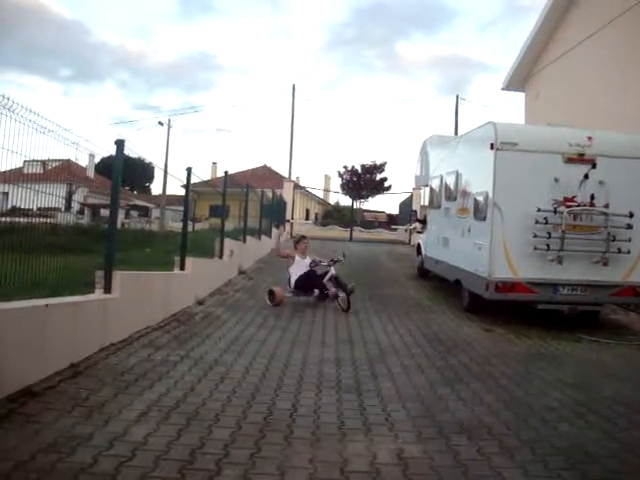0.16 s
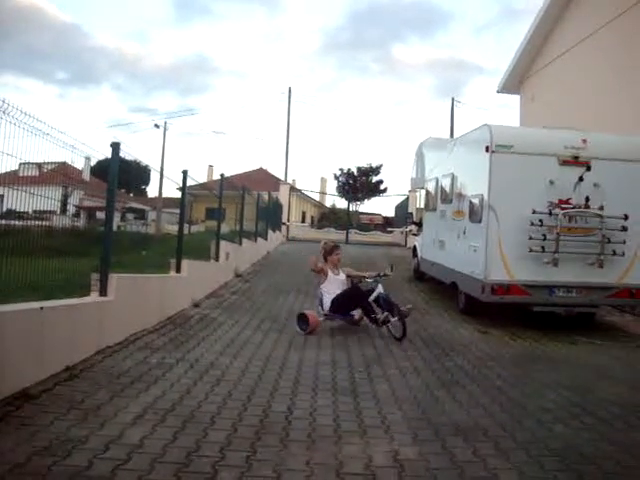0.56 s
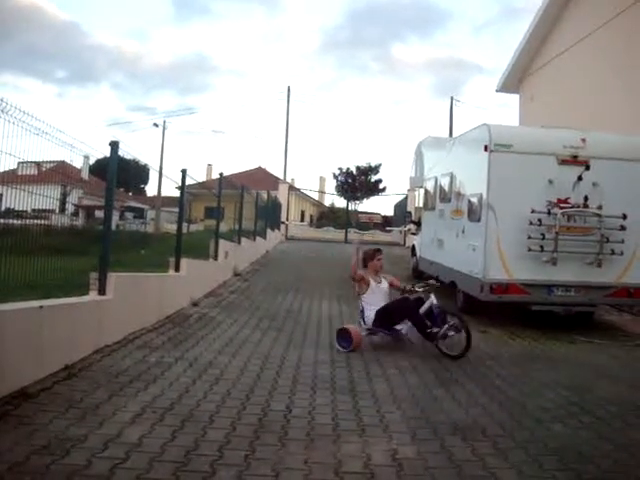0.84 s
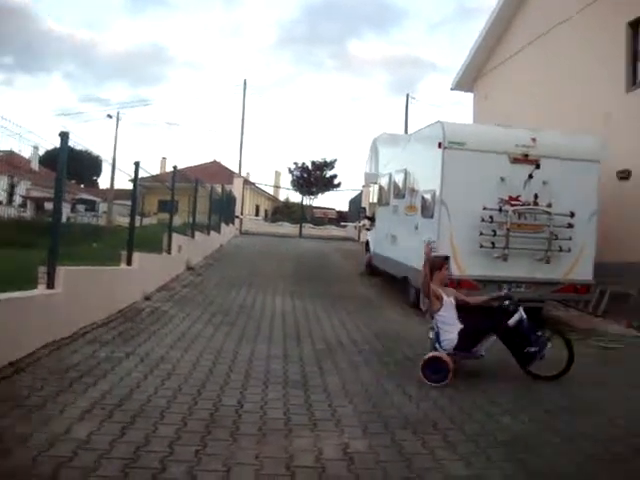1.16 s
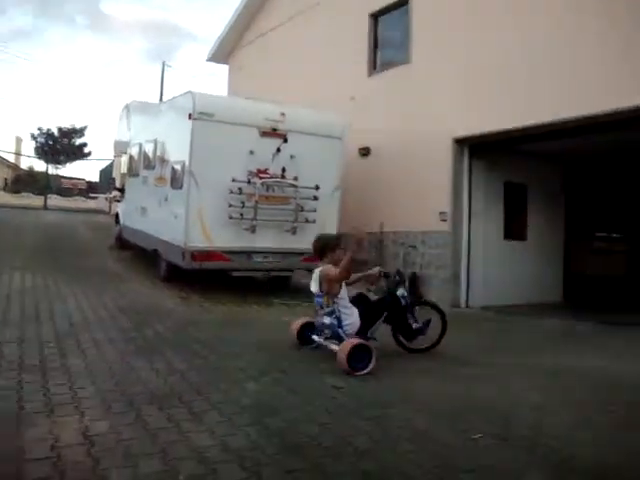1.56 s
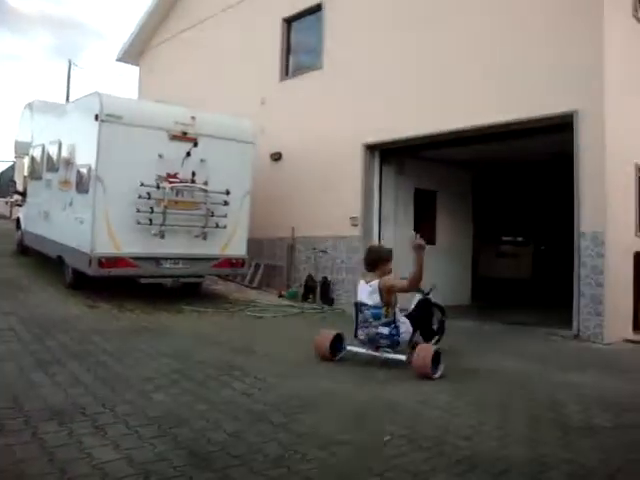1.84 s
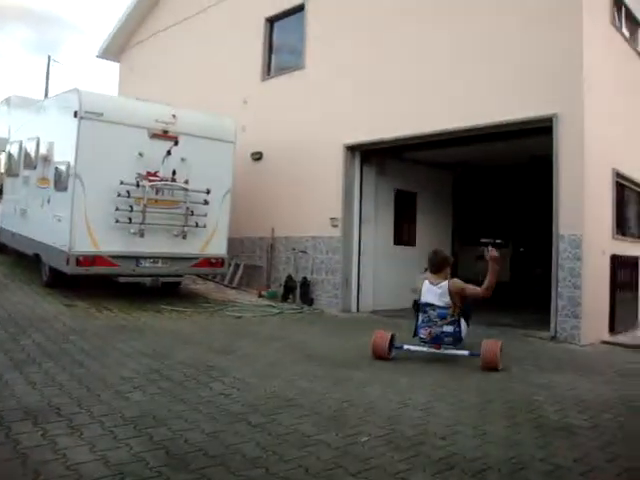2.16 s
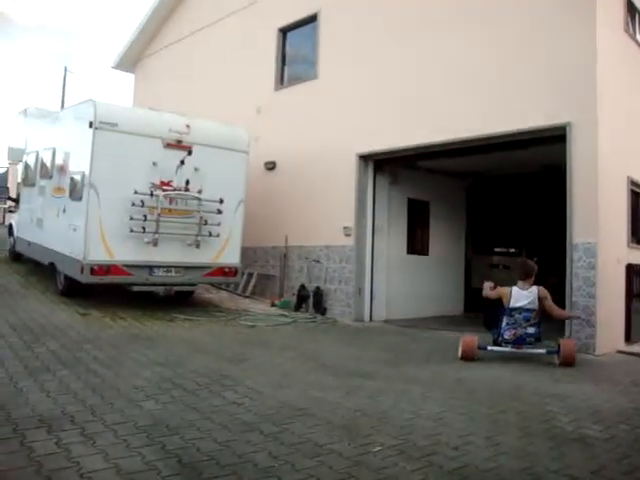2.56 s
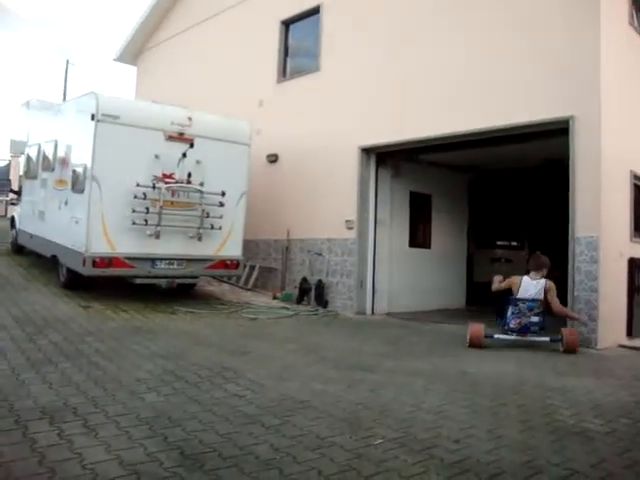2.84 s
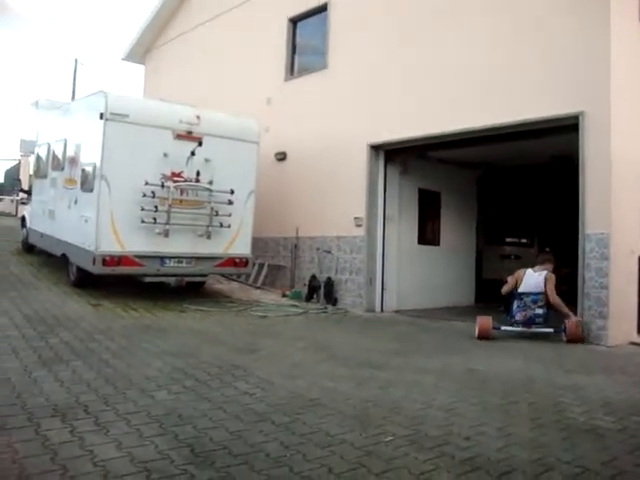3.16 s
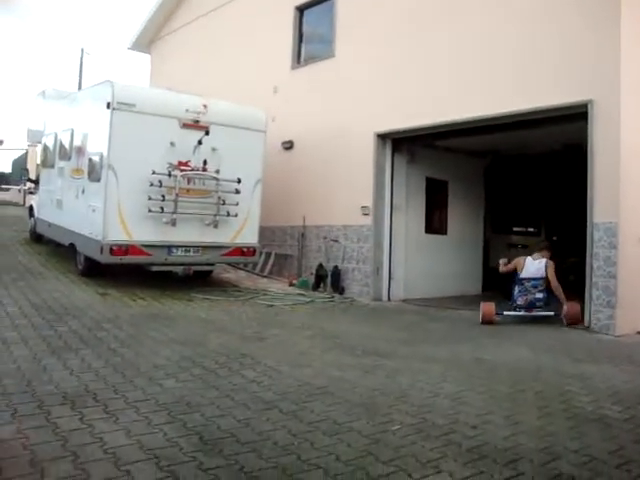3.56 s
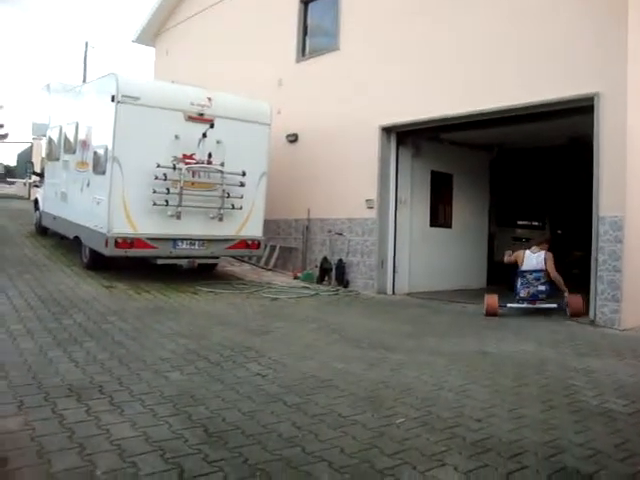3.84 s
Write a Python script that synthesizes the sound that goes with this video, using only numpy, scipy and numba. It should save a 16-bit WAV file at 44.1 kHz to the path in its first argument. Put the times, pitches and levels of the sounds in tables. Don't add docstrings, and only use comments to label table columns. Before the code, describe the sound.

Hard plastic trike wheels scrape and roll loudly over paving, then stop with a foot thump

```python
import sys
import numpy as np
from scipy import signal
from scipy.io import wavfile
from scipy.ndimage import uniform_filter1d
from numba import njit

SR = 44100
rng = np.random.default_rng(int(sys.argv[2]) if len(sys.argv) > 2 else 0)


def field_ratio(decibels):
    return 10 ** (np.asarray(decibels, dtype=float) / 20)


def wav_out(sig):
    wavfile.write(sys.argv[1], SR, np.round(np.clip(np.atleast_2d(sig).T, -1, 1) * 32767).astype(np.int16))


N = 176400

# t/s, peak level/dB, f/Hz, decay time t60/s
SETTLING = [(2.879, -31.5, 8040, 0.021), (2.995, -38, 4000, 0.022), (3.035, -41, 9200, 0.017),
            (2.971, -36, 3500, 0.038), (3.075, -27, 1040, 0.053), (3.172, -46, 4500, 0.038),
            (3.197, -43, 4800, .02), (3.495, -39, 2480, 0.029), (3.54, -33, 4530, 0.022),
            (3.556, -33.5, 8850, 0.028), (3.623, -42.5, 2800, 0.15), (3.855, -46, 4830, 0.12),
            (3.877, -37, 800, 0.092)]


def level(x, db):
    return x * field_ratio(db) / np.sqrt(np.mean(x ** 2) + 1e-18)


def walk(rate):
    values = rng.standard_normal(600)
    place = np.arange(N) * rate / SR
    k = place.astype(int)
    blend = np.sin((place - k) * np.pi / 2) ** 2
    return 1.15 * (values[k] + (values[k + 1] - values[k]) * blend)


def band(x, hz, width):
    return signal.lfilter(*signal.iirpeak(min(hz, .45 * SR), max(hz / width, .1), fs=SR), x)


def twice(x, hz, width):
    return band(band(x, hz, width), hz, width)


@njit
def moving_band(x, hz, width):
    y, b, l = np.empty(len(x)), 0., 0.
    for i in range(len(x)):
        g, k = np.tan(np.pi * hz[i] / SR), width / hz[i]
        v = (b + g * (x[i] - l)) / (1 + g * (g + k))
        b, l, y[i] = 2 * v - b, l + 2 * g * v, k * v
    return y


def burst(t, at, rise, t60):
    d = np.maximum(t - at, 0)
    return (1 - np.exp(-d / rise)) * field_ratio(-60 * d / max(t60, .003))


def grit():
    clicks_per_s, spread_db = 9000, 2.0
    chance, sign, size = rng.random((3, N))
    return (chance < clicks_per_s / SR) * np.sign(sign - .5) * field_ratio(-spread_db * np.log(size + 1e-9))


def body(clicks, peaks, flicker_db, rate):
    wander = 0.025
    out = 0
    for hz, width, db in peaks:
        f = hz * (1 + wander * walk(9))
        spot = np.roll(clicks, rng.integers(N))
        ringing = moving_band(moving_band(spot, f, 1.77 * width), f, 1.32 * width)
        out = out + field_ratio(db + flicker_db * walk(rate)) * level(ringing, 0)
    return level(out, 0)


def wheels(t):
    # t/s, scrape level/dB, slide level/dB, roll level/dB, dust level/dB, sleeve ring f/Hz
    ride = [(0, -24, -2.5, -12.5, -13, 2200), (0.143, -22, 0.5, -7.5, -11.5, 2410),
            (.21, -22.5, -4.5, -9, -12.5, 2330), (.31, -26.5, -4, -10.5, -8, 2400),
            (.355, -22, -1, -12, -11, 2410), (.4, -21.5, -2.5, -14.5, -10, 2330),
            (.5, -26, -0.5, -11.5, -12.5, 2470), (.56, -21.5, -3.5, -12, -14.5, 2630),
            (.67, -29, 3, -5, -8.5, 2500), (0.782, -23, -4.5, -10.5, -18, 2430),
            (0.869, -27, -0.5, -7.5, -12.5, 2340), (.99, -22.5, -1, -12, -18.5, 2430),
            (1.12, -24.5, 0, -7.5, -21, 2300), (1.19, -20.5, -9, -11.5, -20.5, 2440),
            (1.27, -23.5, 0, -9.5, -26, 2340), (1.35, -24, -2, -10, -22, 2480),
            (1.42, -22.5, -4, -10, -27, 2370), (1.525, -25, 2.5, -10.5, -24, 2430),
            (1.555, -24.5, -1, -16, -14.5, 2420), (1.64, -23.5, -2.5, -18, -15.5, 2420),
            (1.75, -26.5, -2, -10.5, -13, 2430), (1.86, -25, -4, -12.5, -15.5, 2360),
            (2.01, -27.5, -3.5, -7.5, -10.5, 2210), (2.241, -23, -8, -14, -14, 2380),
            (2.36, -24.5, -7.5, -11.5, -14.5, 2270), (2.5, -27, -7.5, -11, -17, 2250),
            (2.58, -26, -7.5, -18, -19, 2410), (2.719, -29, -13.5, -12.5, -16.5, 2200),
            (2.87, -40.5, -11, -13, -22, 2370), (3.05, -65.5, -19, 8.5, -1, 2340)]
    # f/Hz, width/Hz, level/dB
    sleeve = [(3130, 1050, -3.5), (1774, 710, -4), (3790, 1330, -2.5), (4520, 890, -5)]
    # f/Hz, width/Hz, level/dB
    skid = [(5230, 710, 2), (6024, 880, 2), (6680, 1000, -9)]
    # f/Hz, width/Hz, level/dB
    frame = [(224.5, 83, -14), (365.3, 71, -4), (543, 203, 1), (800, 247, 2.5), (1130, 390, 3.5),
             (1500, 1070, -0.5)]
    # t/s, peak level/dB, ring f/Hz, length/s
    joints = [(0.123, -9, 1860, 0.021), (0.157, -6, 2660, 0.016), (0.373, -6.5, 2100, 0.027),
              (0.692, -8, 2370, 0.013), (0.743, -3.5, 2340, 0.016), (1.0094, -13, 2180, 0.012),
              (1.053, -19, 2320, 0.015), (1.158, -3.5, 2670, 0.016), (1.268, 0, 2240, 0.015),
              (1.3015, -4.5, 2340, 0.026), (1.39, -19, 2580, 0.043), (1.441, -5.5, 3040, 0.013),
              (1.482, -4.5, 3060, 0.016), (1.518, -12, 2400, 0.023), (1.522, -3, 6180, 0.016),
              (1.8887, 0, 2380, .012), (1.91, -3, 2510, 0.015), (1.924, -6.5, 2040, 0.018),
              (2.204, -14, 2510, 0.017), (2.525, -7, 2460, 0.02), (2.531, -5.5, 3370, 0.016),
              (2.584, -18, 2450, 0.015)]
    chatter_per_s, chatter_db, joint_db = 110, 1.0, -11
    ring_width_hz, ring_db = 480, -2.5

    course = np.array(ride).T
    clicks = level(grit(), 0)
    load, slide, roll, dust, ring = (np.interp(t, course[0], c) for c in course[1:])
    load = load - 150 * np.maximum(t - course[0, -1], 0)
    load = load + chatter_db * walk(chatter_per_s) + 0.17 * walk(24)
    fine = twice(clicks[::-1], 8450, 3700)
    out = field_ratio(ring_db) * body(clicks, [(ring, ring_width_hz, 0)], 1.37, 60)
    out = out + field_ratio(-0.5) * body(clicks, sleeve, 1, 25.2)
    out = out + field_ratio(slide) * body(clicks, skid, 1, 13)
    out = out + field_ratio(roll + 4.0) * body(clicks, frame, 1.17, 14)
    out = out + field_ratio(dust + 1.27 * walk(34.92)) * level(fine, 0)
    out = field_ratio(load) * out
    for at, db, hz, length in joints:
        a = int((at - .004) * SR)
        x = clicks[a:a + 6000] * burst(np.arange(6000) / SR, 0, 0.0027, 4 * length)
        knock = 6.0 * twice(x, hz, 800) + 1.1 * band(x, 2800, 3000)
        knock = knock + 1.0 * band(band(x, 5400, 2000), 3800, 2000)
        out[a:a + 6000] += field_ratio(db + joint_db) * knock
    return out


def town(t):
    # f/Hz, level per Hz/dB
    spectrum = [(40, -31), (140, -11), (300, -6.5), (500, -0.5), (1050, -5.5), (1600, -7.5), (4000, -16),
                (10000, -16)]
    # t/s, level/dB, length/s
    puffs = [
        (0.07, -47, 0.043),
        (0.17, -52, .03),
        (.265, -60, 0.022),
        (0.49, -57, .02),
        (1.242, -67, 0.63),
        (1.525, -68, 0.028),
        (3.232, -57, 0.02),
        (3.885, -65, 0.018),
    ]
    town_db, wind_db = -48.5, -80

    s = np.array(spectrum).T
    swell = .6 * walk(4)
    hum = 0
    for hz in 40 * 2 ** np.arange(0, 8.1, .5):
        db = np.interp(np.log(hz), np.log(s[0]), s[1]) + swell + 2.2 * walk(12)
        hum = hum + field_ratio(db) * twice(rng.standard_normal(N), hz, hz / 2)
    gust = field_ratio(wind_db) + sum(field_ratio(db) * np.exp(-((t - at) / length) ** 2) for at, db, length in puffs)
    wind = band(band(rng.standard_normal(N), 65, 150), 85, 160)
    return level(hum, town_db) + gust * level(wind, 0)


@njit
def walls(x, lags, gain, damp, sway, rates):
    line, soft, out = np.zeros((8, 8192)), np.zeros(8), np.zeros(len(x))
    for i in range(len(x)):
        total = 0.
        for k in range(8):
            at = i + 8192 - lags[k] - sway * np.sin(rates[k] * i)
            j = int(at)
            back = line[k, j & 8191] + (at - j) * (line[k, (j + 1) & 8191] - line[k, j & 8191])
            soft[k] += (1 - damp) * (gain[k] * back - soft[k])
            total += soft[k]
            out[i] += soft[k] * (1 - 2 * (k % 2))
        for k in range(8):
            line[k, i & 8191] = x[i] + soft[k] - total / 4
    return out


def garage(trike, hit):
    hit_db, trike_db, t60_s, damping = -14, -21.5, 0.63, 0.15
    sway_samples, sway_turns_per_s = 6., 1.3
    lags = np.array([743, 919, 1123, 1367, 1601, 1871, 2203, 2557])
    feed = field_ratio(hit_db) * hit + field_ratio(trike_db) * trike + 1e-18
    rates = 2 * np.pi * sway_turns_per_s * lags / lags[0] / SR
    return walls(feed, lags, field_ratio(-60 * lags / SR / t60_s), damping, sway_samples, rates)


def squeal(t):
    # t/s, length/s, level/dB, f/Hz
    squeals = [(1.27, 0.054, -23.5, 2290), (1.155, 0.022, -25.5, 2600), (1.055, 0.036, -28.5, 2400),
               (1.6, 0.018, -26, 2800), (1.62, .03, -28, 2350), (1.44, 0.024, -25, 3300),
               (1.345, 0.021, -29, 3100), (1.507, 0.053, -30, 2540), (2.4, 0.042, -39, 2464),
               (1.29, 0.089, -29, 5600), (1, 0.034, -28, 3900), (2.69, 0.035, -39, 2150),
               (2.78, 0.045, -44, 2160)]
    noise = rng.standard_normal(N)
    out = 0
    for at, length, db, hz in squeals:
        swell = np.exp(-((t - at) / length) ** 2)
        out = out + field_ratio(db) * swell * level(twice(noise, hz, 120), 0)
    return field_ratio(2.7 * walk(60)) * out


def ticks(t):
    noise, out = rng.standard_normal(N), np.zeros(N + 8000)
    for at, db, hz, t60 in SETTLING:
        a = int(at * SR)
        x = noise[a:a + 5000] * burst(t[:5000], 0, 0.00084, t60)
        out[a:a + 5000] += field_ratio(db + 8.5) * twice(x, hz, hz)
    return out[:N]


def thump(t):
    # t/s, level/dB, contact time/s
    blows = [
        (3.2241, 3.5, 0.0006),
        (3.229, -4.5, 0.00039),
        (3.234, 1, 0.00047),
        (3.262, -8, 0.00059),
        (3.277, -3.5, 0.0025),
        (3.294, -10, .0012),
        (3.331, -7.5, 0.001),
        (3.38, -24, 0.0013),
        (3.42, -19, 0.0015),
    ]
    # t/s, level/dB
    sole = [
        (3.2246, -3.5),
        (3.2291, -7),
        (3.2347, -9),
        (3.2375, -11),
        (3.2412, -13),
    ]
    # f/Hz, level/dB, decay time t60/s
    panel = [(234, -4, 0.12), (251, 1.5, 0.096), (377.6, 2, 0.16), (397, -13, 0.13), (445, 2, 0.045),
             (480, -10, 0.064), (672, -4, 0.11), (920, -8, 0.025), (1460, 0, 0.015), (2000, -3.5, 0.038),
             (2200, -9, .04), (2440, -21, .07), (4300, -9, 0.036)]
    thump_db, crack_db = -27.5, -10
    snap_width_s, snap_lean = .00034, .3
    scuff_s, scuff_len_s, scuff_db = 3.2105, 0.037, -27

    noise = rng.standard_normal(N)
    rumble = band(noise, 340, 910)
    push = 0
    for at, db, contact in blows:
        pulse = np.exp(-((t - at) / contact * 2.9) ** 2) / contact * 0.00079
        push = push + field_ratio(db) * (pulse + 0.53 * burst(t, at, 0.0016, 0.16) * rumble)
    a = int(blows[0][0] * SR) - 200
    d = np.arange(N - a) / SR
    rings = sum(field_ratio(db - 60 * d / t60) * np.sin(2 * np.pi * hz * d) for hz, db, t60 in panel)
    ringing = np.zeros(N)
    ringing[a:] = signal.fftconvolve(np.diff(push[a:], prepend=0), rings)[:N - a]

    crack = sum(field_ratio(db) * burst(t, at - .0004, 0.00017, .035) for at, db, contact in blows[:5])
    crack = crack * band(band(noise, 1630, 2400), 1400, 3400)

    back = noise[::-1]
    rub = band(band(back, 3500, 1300), 4350, 1300) + 1.5 * band(band(back, 1400, 2400), 1500, 3000)
    scuff = burst(t, scuff_s, 0.0011, 6 * scuff_len_s) * rub

    snaps = 0
    for at, db in sole:
        u = (t - at) / snap_width_s
        snaps = snaps + field_ratio(db) * (u - snap_lean) * np.exp(-u ** 2)
    out = band(snaps, 1240, 2600) - field_ratio(thump_db) * ringing
    return out + field_ratio(crack_db) * crack + field_ratio(scuff_db + 13) * scuff


def starve(x):
    holes_from_hz, hole_width_hz = 4800, 560
    loud_share, quiet_share = .09, .36
    f, s, z = signal.stft(x, SR, nperseg=384)
    k = np.maximum((f - holes_from_hz) / hole_width_hz + 1, 0).astype(int)
    quiet = uniform_filter1d(np.abs(z).mean(axis=0), size=12) < field_ratio(-66)
    own = np.repeat(rng.random((k.max() + 1, len(s))), 3, axis=-1)[..., :len(s)]
    shared = np.repeat(rng.random(len(s)), 3, axis=-1)[..., :len(s)]
    after = sum(np.abs(s - row[0] - .022) < .012 for row in SETTLING) > 0
    chance = np.where(quiet, (own + shared * np.where(after, .2, 1)) ** 2 / 2, own)
    slope = np.minimum(k[:, None] / np.where(quiet, 11, 3), 1)
    share = slope * np.where(quiet, quiet_share, loud_share)
    return signal.istft(z * (chance[k] >= share), SR, nperseg=384)[1][:N]


def scene():
    t = np.arange(N) / SR
    room_top_hz, bass_hz = 5760, 223
    trike = wheels(t) + squeal(t)
    dull = signal.butter(3, room_top_hz, fs=SR, output="sos")
    hit = signal.sosfilt(dull, thump(t)) + ticks(t)
    thin = signal.butter(3, bass_hz, "high", fs=SR, output="sos")
    near = signal.sosfilt(thin, trike + hit + garage(trike, hit))
    return np.array([near + town(t)] * 2)


def roll_off(x):
    return signal.sosfilt(signal.butter(12, 16000, fs=SR, output="sos"), x)


def record(dry):
    t = np.arange(N) / SR
    gap_s, gap_len_s = 3.2045, .006
    click_s, click_db, top_hz = .4915, -15.5, 10050
    x = dry[0] * (1 - 0.96 * np.exp(-((t - gap_s) / gap_len_s * 2) ** 4))
    x = starve(np.tanh(1.1 * x) / 1.118)
    x = signal.sosfilt(signal.ellip(12, .3, 95, top_hz, fs=SR, output="sos"), x)
    x[int(click_s * SR)] += field_ratio(click_db)
    return roll_off(np.array([x, x]))


dry = scene()
out = record(dry)
wav_out(out)
```